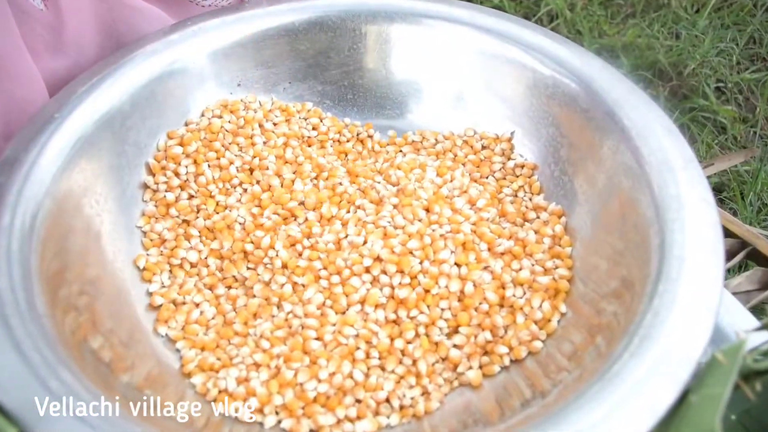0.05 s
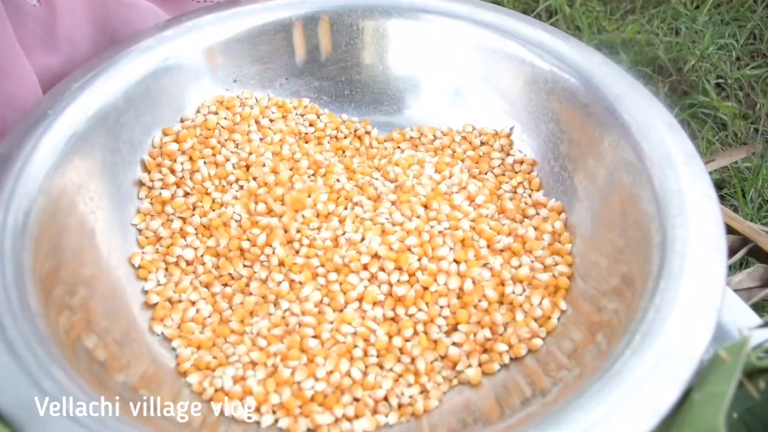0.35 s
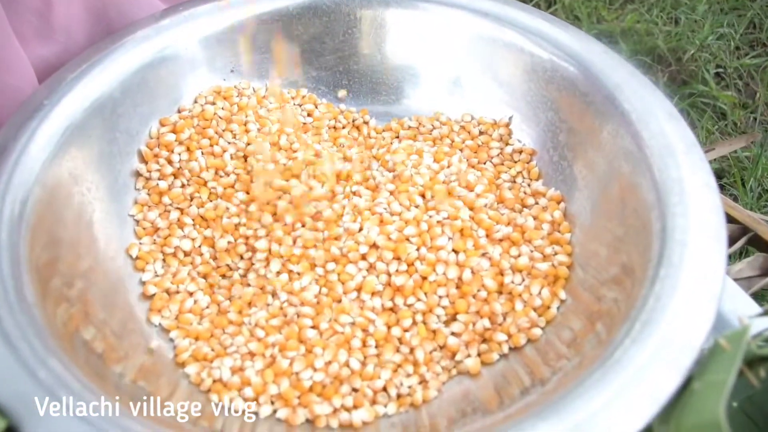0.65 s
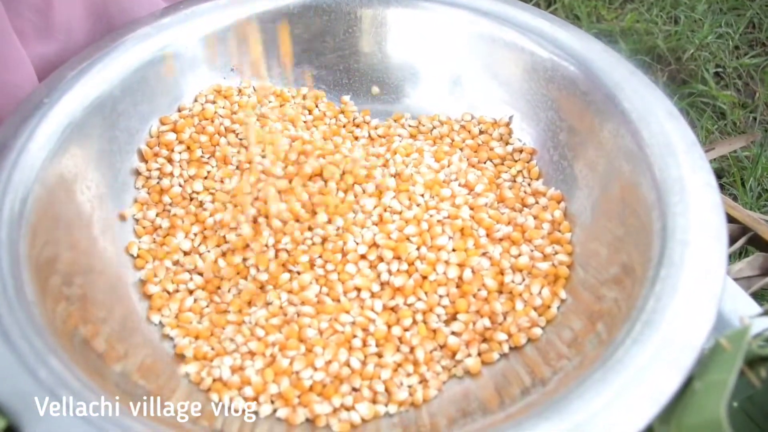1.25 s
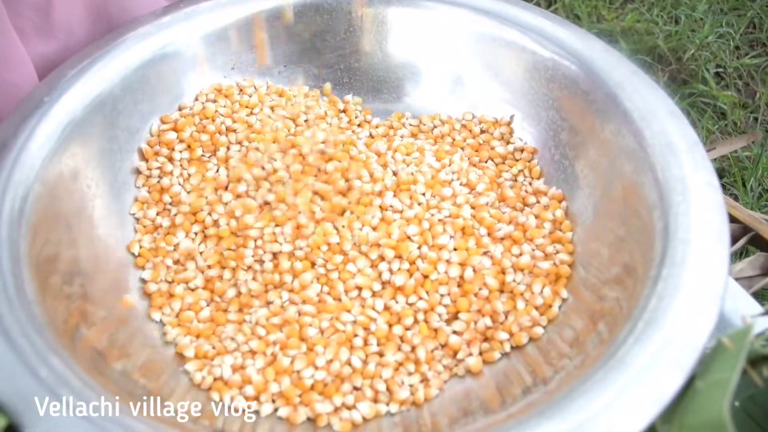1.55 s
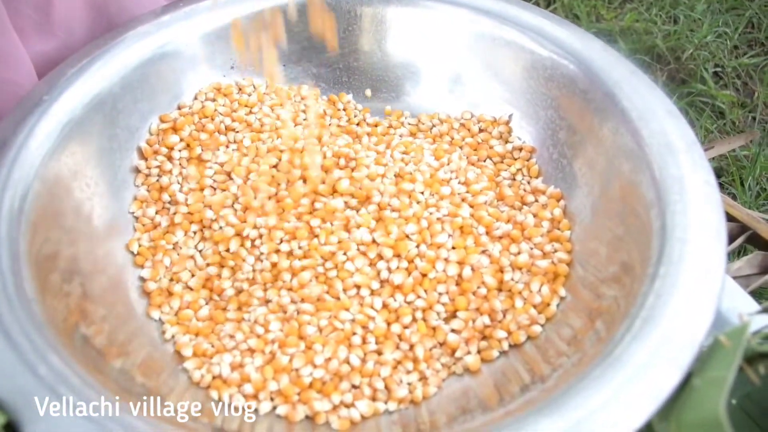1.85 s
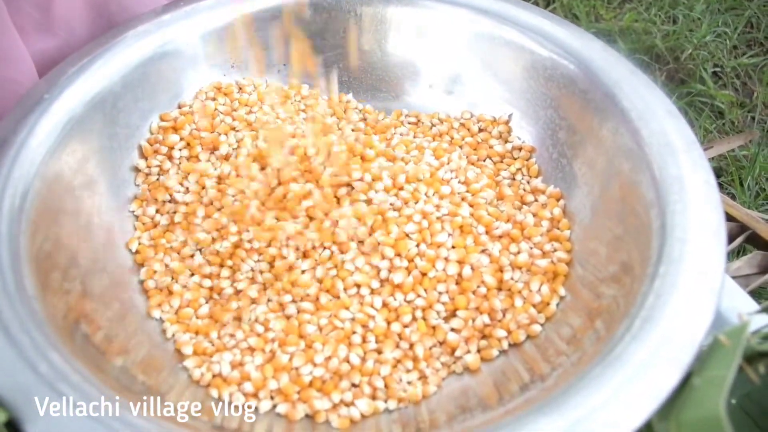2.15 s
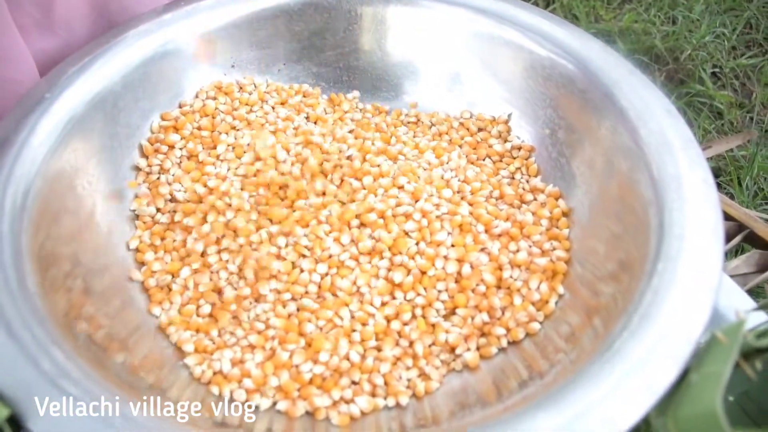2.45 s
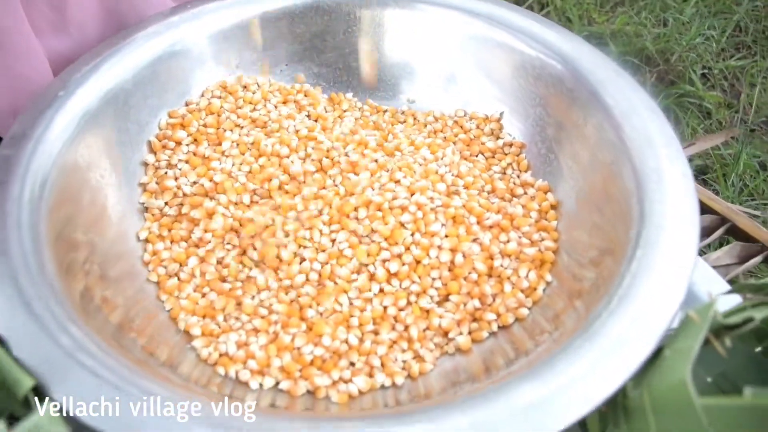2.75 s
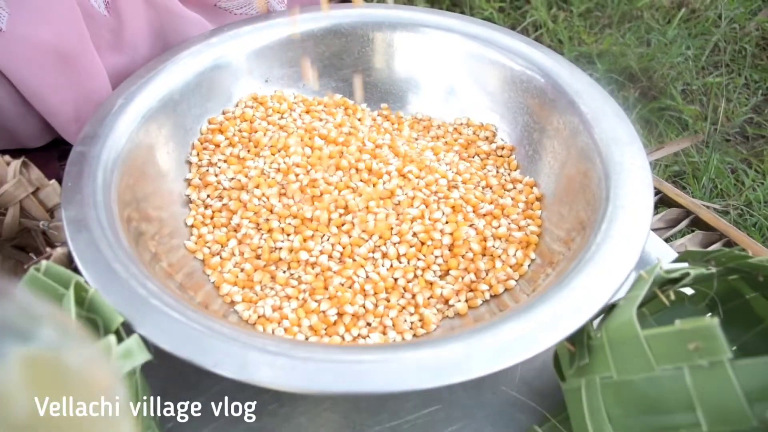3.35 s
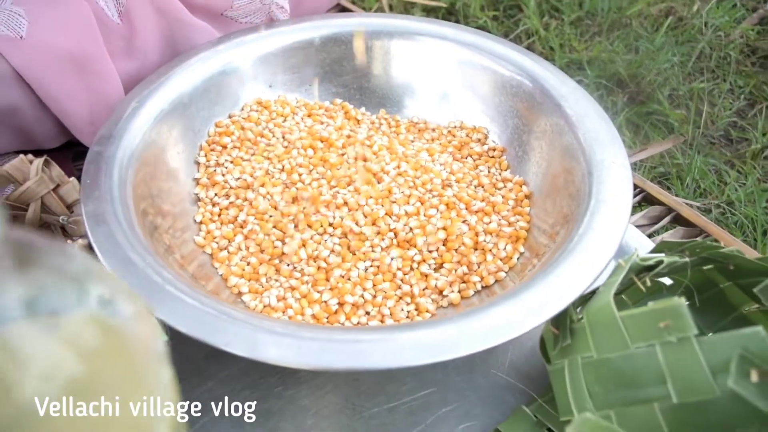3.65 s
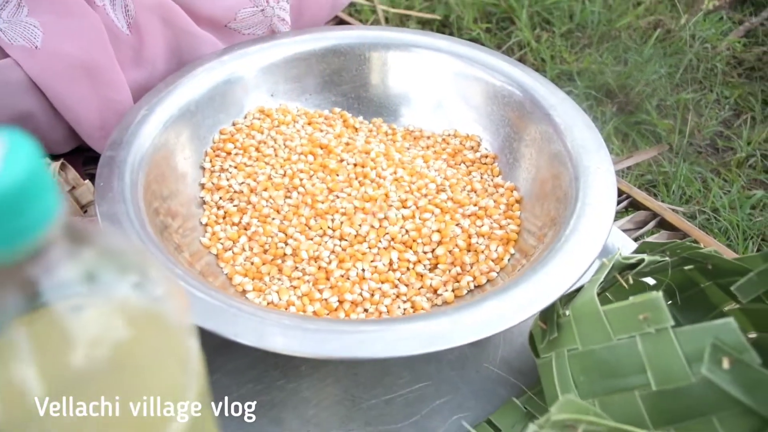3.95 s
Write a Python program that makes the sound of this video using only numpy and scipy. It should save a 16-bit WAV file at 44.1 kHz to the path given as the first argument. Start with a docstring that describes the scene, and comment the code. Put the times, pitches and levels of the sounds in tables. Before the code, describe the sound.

Dry corn kernels pour and rattle onto a heap in a metal bowl.

```python
"""Outdoors, close to a metal bowl, dry corn kernels are poured onto the heap it already holds.
Each impact spreads through neighbouring kernels as a train of contacts, heard as a thud and a click.
Kernels that hit the bare wall excite its modes in a short damped ping, and clumps bump the whole bowl.
The stream starts with single kernels, thickens, then thins to a last few over faint steady air.
A limiter holds the peaks down."""
import sys
import numpy as np
from scipy import signal
from scipy.fft import rfft, irfft
from scipy.io import wavfile
from scipy.ndimage import uniform_filter1d, minimum_filter1d

SR = 44100
rng = np.random.default_rng(int(sys.argv[2]) if len(sys.argv) > 2 else 0)


def output_pcm(signal):
    """Save a mono or channel-first signal as 16-bit PCM at the path in sys.argv[1].

    Samples are clipped to [-1, 1] before scaling.
    """
    pcm = np.clip(np.atleast_2d(signal).T, -1, 1) * 32767
    wavfile.write(sys.argv[1], SR, np.round(pcm).astype(np.int16))


N = 176400

# Distinct landings on the heap. Each row: start in seconds, thud level in dB, click level in dB
# relative to the thud. Both levels are before their trims.
HEAP_LANDINGS = [(0.03, -36.5, -2), (0.057, -45, -19), (0.086, -46.5, -7), (0.309, -28, -10.5),
                 (0.318, -46, -10), (0.332, -27.5, -10), (0.334, -30, -7), (0.352, -22.5, -9),
                 (0.365, -37, -3), (0.369, -26, -9), (0.381, -37.5, -1), (0.401, -27, -5),
                 (0.407, -32, -13), (0.415, -19, -5.5), (0.43, -29.5, -11), (0.451, -14, -7),
                 (0.466, -15.5, -8), (0.484, -23, -4), (0.503, -27, -5), (0.507, -25, -8), (0.534, -36, -1),
                 (0.547, -29, -2), (0.566, -18, -11), (0.576, -23, -6), (0.64, -12.5, -8.5),
                 (0.726, -41, 4), (0.752, -30, -2), (0.849, -17, -3), (0.911, -28, 0), (0.979, -27, -22),
                 (1.09, -30, -21), (1.116, -12, -5), (1.165, -31, -5), (1.247, -26.5, -10), (1.262, -28, 1),
                 (1.283, -20, -14.5), (1.318, -22, -4), (1.46, -29, -10), (1.913, -27, -6),
                 (1.969, -25, -12), (1.997, -22, -10), (2.081, -16, -11), (2.168, -18, -7),
                 (2.238, -29, -14), (2.262, -32, -12), (2.329, -27, -22), (2.383, -35, -10),
                 (2.389, -24.5, -5), (2.41, -39, -0.5), (2.429, -36, 0), (2.491, -30, -12),
                 (2.523, -27.5, -4), (2.533, -27.5, -9.5), (2.549, -30.5, -5), (2.557, -37.5, -1),
                 (2.588, -32.5, -2), (2.621, -28, 0), (2.655, -19.5, -11), (2.685, -31, -3),
                 (2.699, -26.5, -11), (2.731, -28, -7.5), (2.746, -31, -5), (2.774, -36, -8),
                 (2.783, -37, -13), (2.802, -31, -6), (2.844, -20.5, -4.5), (2.893, -34, -12),
                 (2.904, -34, -16), (2.921, -39, -5), (2.931, -32.5, -5), (2.954, -20, -7),
                 (3.004, -36, -4.5), (3.016, -36, -3), (3.057, -28, 3), (3.09, -31, -9), (3.11, -37, -5),
                 (3.183, -33, -4), (3.213, -32, -0.5), (3.222, -31.5, -13), (3.234, -39, -12),
                 (3.246, -36, -5), (3.269, -33.5, 0.5), (3.277, -33, -13), (3.284, -26, -2),
                 (3.324, -33.5, -3), (3.342, -32.5, -8), (3.367, -23.5, -8), (3.38, -35.5, -1),
                 (3.412, -27.5, -1), (3.424, -35, -10), (3.438, -36.5, -5), (3.444, -37, -4.5),
                 (3.451, -29.5, -4), (3.482, -46.5, 5.5), (3.514, -24, -3), (3.537, -32, -3.5),
                 (3.547, -37, -2), (3.566, -36.5, -8.5), (3.594, -33, 1), (3.606, -32, -7),
                 (3.616, -36, -12), (3.64, -38.5, -8), (3.665, -41.5, 0), (3.676, -38, -9),
                 (3.686, -33.5, -13), (3.704, -36.5, -3), (3.712, -37, -13.5), (3.736, -40.5, -16),
                 (3.751, -43, -2), (3.763, -42, -11), (3.778, -33.5, -12), (3.784, -36, -1),
                 (3.875, -41, -4), (3.945, -36.5, -8), (3.957, -47, -9)]
# Course of the dense stream. Each row: time in seconds, thud level in dB, click level in dB, before trims.
STREAM_LEVELS = [(0, -48, -51.5), (.045, -51, -58), (.12, -64.5, -74), (.3, -75.5, -74), (.34, -54, -60),
                 (.44, -49, -52), (.47, -36.5, -42.5), (0.681, -33, -38), (1.0, -32, -35.5),
                 (1.45, -34, -36), (1.699, -33, -37.5), (2.1, -34, -31.5), (2.3, -37, -36.5),
                 (2.501, -42, -45), (2.79, -43, -45), (2.871, -38, -35), (3.03, -40, -40.5),
                 (3.25, -42, -45), (3.31, -49, -52), (3.49, -47.5, -55), (3.579, -43, -45.5),
                 (3.731, -53, -68), (3.8, -50.5, -49), (3.899, -59.5, -65), (4, -59.5, -71)]
# Thud of a kernel in the heap and bowl. Each row: frequency in Hz, relative level in dB.
THUD_SPECTRUM = [(50, -27), (150, -17), (270, -17), (350, -5), (450, 3), (540, -1), (650, -2), (780, -9.5),
                 (920, -0.5), (1070, 0), (1450, -4), (1900, -4.5), (2450, -0.5), (3600, -6), (4300, -2.5),
                 (5300, -6), (6200, -19.5), (9000, -20), (16000, -37)]
# Hard hulls clicking together. Each row: frequency in Hz, relative level in dB.
CLICK_SPECTRUM = [(200, -33), (2000, -25), (4500, -7), (6600, -8), (8000, -2), (9200, -1.5), (11500, -3.5),
                  (13500, -6.5), (15700, -15)]
# Strikes on the bare wall. Each row: start in seconds, strike level in dB, ring pitch in Hz,
# time to decay by 60 dB (T60) in seconds, skid level in dB relative to the strike.
WALL_STRIKES = [(0.001, -42.5, 5280, 0.13, 2), (0.031, -40, 5330, 0.067, -2.5),
                (0.611, -31.5, 5080, 0.1, 0), (0.668, -31.5, 5166, 0.12, 1.5),
                (0.697, -29.5, 5270, 0.16, -3), (0.729, -26, 5056, 0.036, -7),
                (0.76, -16.5, 5320, 0.097, -6), (0.895, -25, 5157, 0.064, -3),
                (0.979, -33.5, 5110, 0.13, -3.5), (1.009, -34.5, 5300, 0.18, 3),
                (1.038, -30, 5090, 0.17, 2.5), (1.134, -33, 5270, 0.088, 0), (1.149, -31, 5120, 0.13, -6),
                (1.185, -31.5, 5000, 0.22, 2), (1.211, -22.5, 4990, 0.07, -6),
                (1.438, -29.5, 5080, 0.12, -5), (1.509, -23.5, 5180, 0.13, -11),
                (1.533, -23, 5160, 0.17, -3.5), (1.6, -32, 5220, 0.091, -1), (1.66, -25, 4900, 0.17, 1.5),
                (1.79, -30, 5188, 0.068, 0), (2.009, -30.5, 5200, 0.35, 3), (2.021, -30, 5170, 0.075, -4),
                (2.067, -25.5, 5030, 0.055, -7), (2.123, -23, 5235, 0.18, -6), (2.2, -23.5, 5210, 0.15, -3),
                (2.283, -24.5, 5210, 0.16, 0), (2.313, -26, 5180, 0.045, -4),
                (2.345, -18.5, 5230, 0.11, -2), (2.412, -33.5, 5100, 0.1, 0), (2.439, -31, 5140, 0.1, 0),
                (2.455, -28.5, 5100, 0.062, -16), (2.473, -25, 5320, 0.084, 0), (2.561, -31, 5030, 0.17, 2),
                (2.577, -26, 5050, 0.037, -16), (2.647, -26.5, 5270, 0.061, -4.5),
                (2.676, -29, 5060, 0.1, -4), (2.758, -32, 5126, 0.045, 0), (2.815, -30, 5300, 0.08, -4),
                (2.852, -23.5, 5220, 0.11, -8), (2.949, -28.5, 5200, 0.19, 1.5),
                (2.993, -25, 5220, 0.12, -6), (3.081, -28, 5340, 0.079, -6), (3.135, -32.5, 5150, 0.15, 0),
                (3.144, -23.5, 5256, 0.19, 0), (3.222, -35, 5240, 0.11, -1), (3.358, -39.5, 5300, 0.053, 4),
                (3.79, -21.5, 5060, 0.025, -3), (3.926, -29, 5150, 0.029, -0.5)]
# Modes of the wall. Each row: frequency as a ratio to the ring pitch, relative level in dB.
WALL_MODES = [(0.828, -8.5), (0.898, -10.5), (0.952, 4.5), (.977, -4), (1.0, -0.5), (1.02, -1),
              (1.058, 0.5), (1.093, -9), (1.135, -5), (1.698, -24)]
# A kernel skidding on metal. Each row: frequency in Hz, relative level in dB.
SKID_SPECTRUM = [(300, -39), (2500, -22), (4400, -4), (5900, -3.5), (6600, -1), (8800, 4), (10500, 0.5),
                 (12500, -6.5), (15700, -10.5)]
# Sympathetic ring of the wall. Each row: frequency in Hz, relative level in dB.
SHIMMER_SPECTRUM = [(300, -32), (4200, -31), (4650, -12), (5050, 0), (5550, 0.5), (6100, -26), (16000, -34)]
# Clumps nudging the bowl on its support. Each row: start in seconds, initial level in dB.
BOWL_NUDGES = [(.402, -51), (.564, -42), (.721, -49.5), (1.222, -52), (2.077, -52), (2.655, -49),
               (3.348, -46)]
# Outdoor air. Each row: frequency in Hz, relative spectral density in dB.
AIR_SPECTRUM = [(15, -51), (25, -3.5), (142, -5), (176, -13.5), (207, -0.5), (231, -4.5), (383, -18),
                (438, -21), (3630, -23.5), (15000, -35)]

# Contact trains. Each holds: spectrum, T60 of the flurry in seconds, contacts per second.
THUD_TRAIN = (THUD_SPECTRUM, 0.01, 5000)
CLICK_TRAIN = (CLICK_SPECTRUM, 0.0076, 2500)


def landings(thud_trim_db=2, click_trim_db=2.5):
    """Granular impact: single kernels strike the heap and stand out from the stream."""
    starts, db, click_db = np.transpose(HEAP_LANDINGS)
    return heap(starts, db + thud_trim_db, db + click_db + click_trim_db).sum(0)


def stream(count=1600, thud_trim_db=2.5, click_trim_db=1):
    """Shot noise: irregular landings merge into a rush, denser and louder as the flow grows."""
    times, *levels = np.transpose(STREAM_LEVELS)
    t = np.arange(N) / SR
    thud_db, click_db = (np.interp(t, times, level) for level in levels)
    kernels_per_s = 60 + 330 * 2 ** ((thud_db + 33) / 9)  # the part above 60 doubles every 9 dB
    fallen = np.cumsum(kernels_per_s) / SR
    jitter, size_scatter, click_scatter = rng.standard_normal((3, count))
    turn = np.arange(count) + 0.5 * jitter
    falls = turn < fallen[-1]
    starts = np.interp(turn[falls], fallen, t)
    size_db = 4 * size_scatter[falls]
    tracks = heap(starts, size_db, size_db + 2.5 * click_scatter[falls])
    thuds, clicks = tracks / np.sqrt(kernels_per_s)  # incoherent powers add; this evens out the level
    return unit(thuds) * amp(thud_db + thud_trim_db) + unit(clicks) * amp(click_db + click_trim_db)


def heap(starts, thud_db, click_db, count=300):
    """Superposition: landings sum into one track of thuds and one of shorter hull clicks."""
    tracks = np.zeros((2, N))
    thuds = impacts(count, *THUD_TRAIN)
    clicks = impacts(count, *CLICK_TRAIN)
    for track, sounds, levels in zip(tracks, (thuds, clicks), (thud_db, click_db)):
        for k, (start, gain) in enumerate(zip(starts, amp(levels))):
            add(track, start, gain * sounds[k % count])
    return tracks


def impacts(count, spectrum, t60, contacts_per_s, window_s=0.0025):
    """Convolution: each contact excites an impulse response. The strongest moment is scaled to rms 1."""
    sounds = signal.fftconvolve(contacts(count, t60, contacts_per_s), responses(count, spectrum), axes=1)
    power = uniform_filter1d(sounds ** 2, int(window_s * SR), axis=1, mode="constant")
    return sounds / np.sqrt(power.max(1, keepdims=True))


def contacts(count, t60, contacts_per_s, spread_s=0.00095, settle_t60_s=0.072, size=2600):
    """Inelastic collisions: a first contact sets off a quickly dying flurry, then faint settling."""
    t = np.arange(size) / SR
    jostle = amp(-0.5 - 60 * t / t60) * (1 - np.exp(-t / spread_s))
    settle = amp(-18.5 - 60 * t / settle_t60_s)
    touches = rng.random((count, size)) < contacts_per_s / SR
    train = touches * rng.standard_normal((count, size)) * (jostle + settle)
    train[:, 0] = 0.57  # the first contact
    return train


def responses(count, spectrum, colour_scatter_db=2.5, size=1024):
    """Minimum-phase impulse responses: every spot in the bowl colours a contact slightly differently."""
    scatter = colour_scatter_db * rng.standard_normal((count, len(spectrum)))
    cepstrum = irfft(np.log([gains(spectrum, size, row) for row in scatter]))
    cepstrum[:, 1:size // 2] *= 2  # folding onto positive time makes the response causal
    cepstrum[:, size // 2 + 1:] = 0
    return irfft(np.exp(rfft(cepstrum)))


def wall(detune=0.00904, linewidth_hz=76, attack_s=0.00044, size=9000):
    """Modal ringing: a kernel knocks and skids; close wall modes beat and die fast under the heap."""
    out, t = np.zeros(N), np.arange(size) / SR
    ratio, mode_db = np.transpose(WALL_MODES)
    ring_t60 = np.array(WALL_STRIKES)[:, 3:4]
    skids = impacts(len(WALL_STRIKES), SKID_SPECTRUM, 0.66 * ring_t60, contacts_per_s=18000)
    knocks = impacts(len(WALL_STRIKES), *THUD_TRAIN)
    for (start, db, pitch_hz, t60, skid_db), skid, knock in zip(WALL_STRIKES, skids, knocks):
        tuning, level, phase = rng.standard_normal((3, len(WALL_MODES), 1))
        mode_hz = pitch_hz * ratio[:, None] * (1 + detune * tuning)
        # Loose kernels blur the modes: a random walk in phase broadens each line.
        walk = np.cumsum(rng.standard_normal((len(WALL_MODES), size)), 1)
        blur = walk * np.sqrt(2 * np.pi * linewidth_hz / SR)
        modes = amp(mode_db[:, None] + 2 * level) * np.sin(2 * np.pi * (mode_hz * t + phase) + blur)
        fade = amp(-60 * t / t60) * (1 - np.exp(-t / attack_s))
        ring = unit(modes.sum(0) * fade) * np.sqrt(np.mean(fade ** 2))
        add(out, start, amp(db + 3) * ring)
        add(out, start, amp(db + skid_db) * skid)
        add(out, start, amp(db - 9) * knock)
    return out


def shimmer(kernels, t60=0.21, gain_db=-13, size=8192):
    """Sympathetic vibration: the wall rings faintly with whatever falls into the bowl."""
    tail = rng.standard_normal(size) * amp(-60 * np.arange(size) / SR / t60)
    tail /= np.linalg.norm(tail)
    ring = irfft(rfft(tail) * gains(SHIMMER_SPECTRUM, size), size)[:size // 2]
    return amp(gain_db) * signal.fftconvolve(kernels, ring)[:N]


def nudges(hz=65, t60=0.11, size=6000):
    """Damped oscillation: nudged by a clump, the loaded bowl gives a soft low bump on its support."""
    out, t = np.zeros(N), np.arange(size) / SR
    for start, db in BOWL_NUDGES:
        add(out, start, amp(db - 60 * t / t60) * np.sin(2 * np.pi * hz * t))
    return out


def air(level_db=-60.5):
    """Stationary noise: the faint outdoor background, strongest at low frequencies."""
    noise = rng.standard_normal(N)
    return amp(level_db) * unit(irfft(rfft(noise) * gains(AIR_SPECTRUM, N), N))


def amp(db):
    """Amplitude ratio of a level in decibels."""
    return 10 ** (np.asarray(db) / 20)


def unit(x):
    """Normalisation to rms 1."""
    return x / np.sqrt(np.mean(x ** 2) + 1e-20)


def gains(spectrum, size, scatter_db=0):
    """Log-frequency interpolation of (Hz, dB) points, each shifted by its scatter, to FFT bin gains."""
    hz, db = np.transpose(spectrum)
    bin_hz = np.fft.rfftfreq(size, 1 / SR)
    return amp(np.interp(np.log(bin_hz + 1), np.log(hz + 1), db + scatter_db))


def add(track, start, sound):
    """Superposition of a sound on a track, from a start in seconds."""
    i = int(np.clip(start * SR, 0, N - 1))
    track[i:i + len(sound)] += sound[:N - i]


def scene():
    """Sound pressures add at a single listening point, alike in both channels."""
    kernels = wall() + landings() + stream()
    return np.tile(kernels + shimmer(kernels) + nudges() + air(), (2, 1))


def record(dry, limit_db=-15, hold_s=0.0028, top_hz=15800):
    """Peak limiting: the gain dips briefly around each loud peak; a sharp low-pass follows."""
    hold = int(hold_s * SR)
    needed_gain = np.minimum(1, amp(limit_db) / (np.abs(dry).max(0) + 1e-9))
    limited = dry * uniform_filter1d(minimum_filter1d(needed_gain, hold), hold)
    passband = np.fft.rfftfreq(N, 1 / SR) < top_hz
    return irfft(rfft(limited) * passband, N)


dry = scene()
out = record(dry)
output_pcm(out)
```